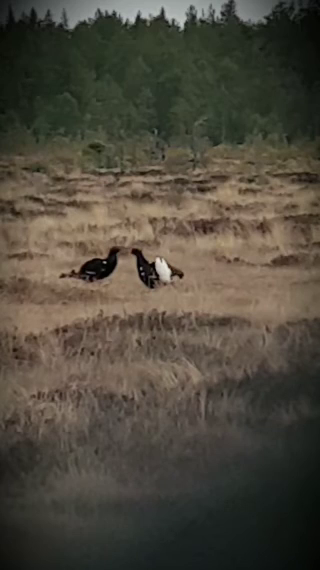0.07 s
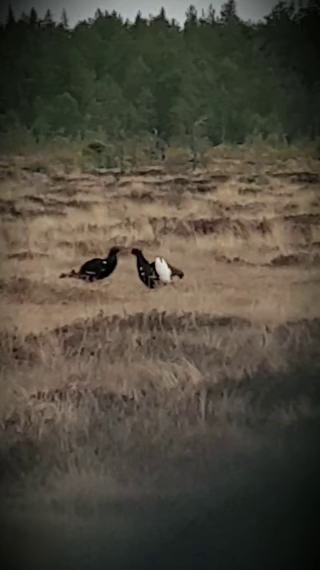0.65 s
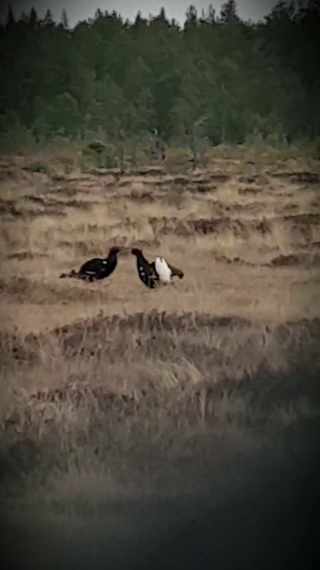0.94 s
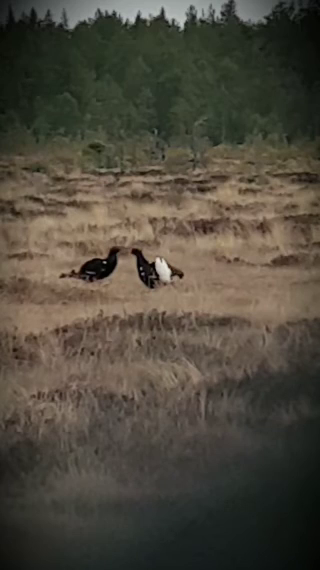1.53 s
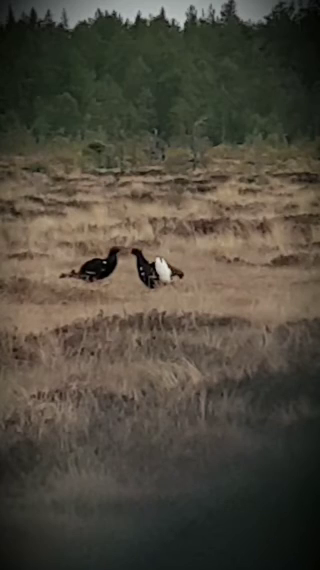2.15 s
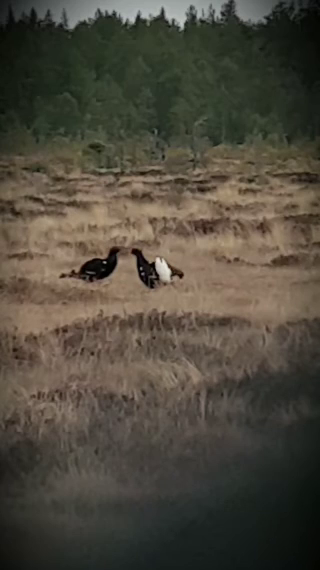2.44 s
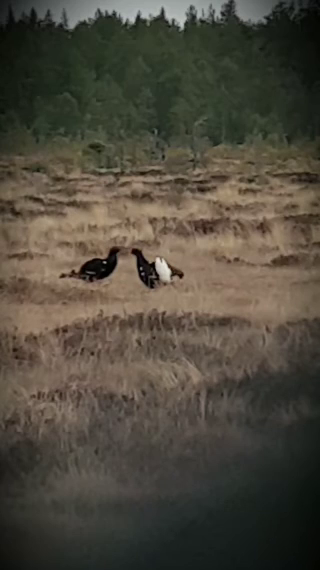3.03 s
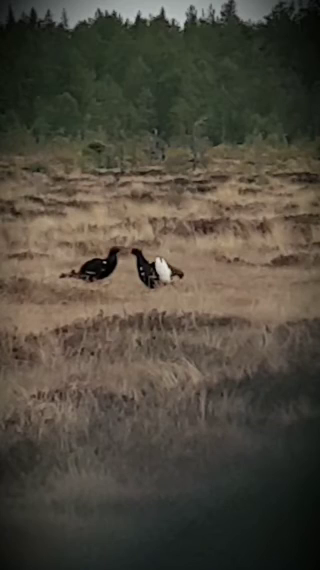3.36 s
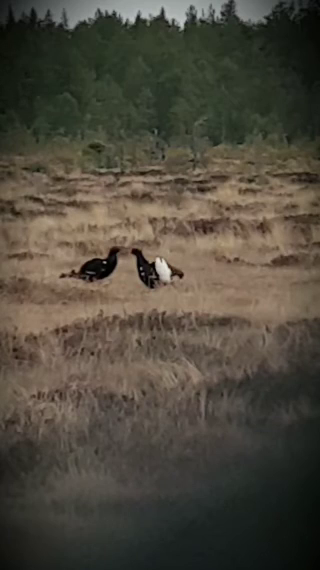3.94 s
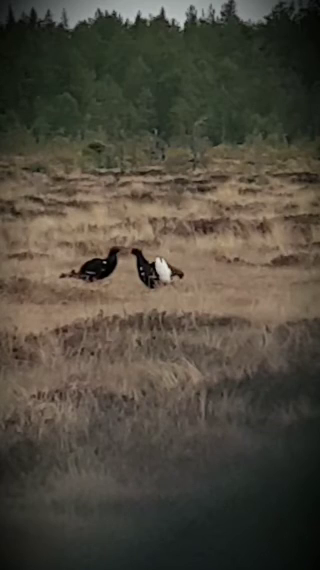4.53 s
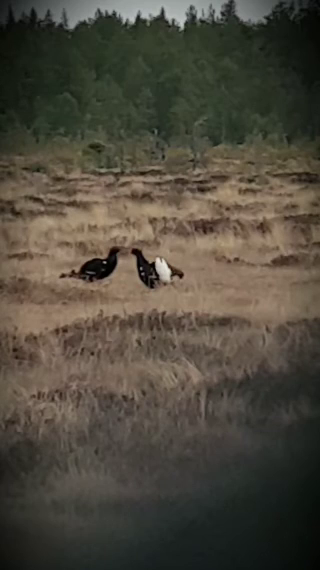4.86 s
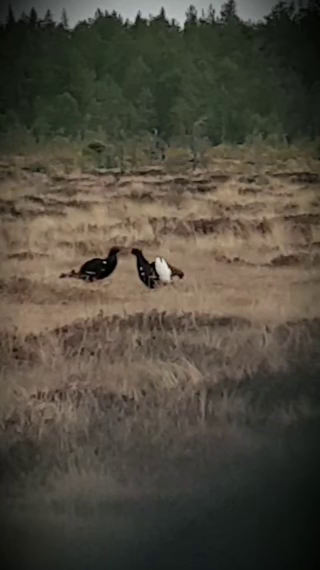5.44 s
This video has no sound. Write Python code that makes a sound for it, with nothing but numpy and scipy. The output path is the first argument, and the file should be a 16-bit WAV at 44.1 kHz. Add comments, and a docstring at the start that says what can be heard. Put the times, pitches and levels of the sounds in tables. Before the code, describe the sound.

A black grouse calls almost straight ahead on an open bog, over the soft continuous bubbling of other grouse and a quiet, wide rush of air. He opens with rounded coos until about 0.6 seconds. A rapid bubbling roll rises and swells from 0.7 to 1.8, leading to a cooed phrase from 2.1 to 3.5. Another roll runs from 3.5 to 4.5, and coos return from 4.8 to the end. Slightly right, a nearby songbird twitters quickly at the start and at 3.6, with short chirps around 1.4 and 2.8 and faint chips later. Farther right, a grouse gives one sharp rasping hiss at 0.5, with softer hisses near 1.1, 2.8 and 3.6. Thin distant whistles are clearest just after 3 seconds. Faint low calls come around 1.6, and faint nasal cackles at 2.2 and 4.8. The forest edge adds a slight echo.

```python
"""A black grouse cock displays on an open bog, bubbling in rising rolls that lead into cooed phrases.
Each note is an almost pure arched tone, coloured by the resonance of his inflated air sac.
Other cocks bubble around him and force rasping hisses through their throats. A songbird twitters close
by in quick sweeps of its syrinx; thin whistles, low calls and nasal cackles come from farther off.
Tussocks and the forest edge scatter the voices softly over the rush of still air."""
import sys
import numpy as np
from scipy import signal
from scipy.fft import rfft, irfft, next_fast_len
from scipy.io import wavfile
from scipy.ndimage import map_coordinates

SR = 44100
rng = np.random.default_rng(int(sys.argv[2]) if len(sys.argv) > 2 else 0)


def store_wav(level_fs):
    """Save 16-bit WAV to argv[1]."""
    pcm = np.round(np.clip(np.atleast_2d(level_fs), -1, 1) * 32767)
    wavfile.write(sys.argv[1], SR, pcm.T.astype(np.int16))


N = 246519


def amp(db):
    """Decibels to gain."""
    return 10 ** (np.asarray(db) / 20)


def unit(x):
    """Scale to rms 1."""
    return x / np.sqrt(np.mean(x ** 2) + 1e-20)


def along(points, hz):
    """Read a curve of (Hz, value) points on a log frequency axis."""
    freqs, values = np.transpose(points)
    return np.interp(np.log(hz + 1), np.log(freqs + 1), values)


def wobble(rate, size=N):
    """A smooth random curve, rate knots a second."""
    knots = rng.standard_normal(int(size * rate / SR) + 4)
    return map_coordinates(knots, [np.arange(size) * rate / SR])


def filtered(x, response):
    """Shape a sound with a gain given as a function of frequency."""
    size = next_fast_len(N + SR // 2)
    return irfft(rfft(x, size) * response(np.fft.rfftfreq(size, 1 / SR)), size)[..., :N]


def add(track, s, sound):
    """Mix a sound into the track from time s."""
    start = round(s * SR)
    sound = sound[max(-start, 0):max(N - start, 0)]
    track[max(start, 0):][:len(sound)] += sound


def phase(hz):
    """Running phase of a pitch curve."""
    return 2 * np.pi * np.cumsum(hz) / SR


def arch(first_hz, middle_hz, last_hz, size):
    """A pitch curve bent smoothly through three points."""
    parabola = np.polyfit([0, .5, 1], [first_hz, middle_hz, last_hz], 2)
    return np.polyval(parabola, np.linspace(0, 1, size))


def gate(size, attack, release):
    """An envelope with rounded ends; attack and release in seconds."""
    t = np.arange(size) / SR
    fade_in = np.sin(np.pi / 2 * np.minimum(t / attack, 1))
    fade_out = np.sin(np.pi / 2 * np.minimum(t[::-1] / release, 1))
    return (fade_in * fade_out) ** 2


def placed(x, left_db, lead_ms):
    """Pan a source: the left channel is left_db louder and lead_ms earlier than the right."""
    sides = np.array([[.5], [-.5]])
    return amp(left_db * sides) * filtered(x, lambda hz: np.exp(2j * np.pi * hz * sides * lead_ms / 1000))


def echo(x, decay, delay_s, spread):
    """Scattered sound: each frequency dies at its own speed; spread sets the stereo width."""
    hz, t, noise = signal.stft(rng.standard_normal((2, SR)), SR, nperseg=256)
    tail = signal.istft(noise * amp(-60 * t / along(decay, hz)[:, None]), SR, nperseg=256)[1]
    late = np.pad(x, (int(delay_s * SR), 0))
    mid, side = signal.fftconvolve(late[None], tail / np.linalg.norm(tail[0]), axes=1)[:, :N]
    return np.array([mid + spread * side, mid - spread * side])


# Resonance of the inflated throat. Each row: frequency in Hz, gain in dB.
AIR_SAC_EQ = [(350, 3.5), (450, 2), (550, 3.5), (610, -5.5), (670, -8), (780, -19.5)]

def coo(lead, rise, fall, first_hz, top_hz, last_hz, attack, release, waver=.0095, droop_db=2):
    """An arched tone that swells as it crosses the air sac's resonance, begun lead s before its top."""
    t = np.arange(-lead, fall, 1 / SR)
    rising = t < 0
    glide = np.minimum(np.abs(t / np.where(rising, rise, fall)), 1) ** np.where(rising, 1.2, 1.345)
    hz = top_hz + (np.where(rising, first_hz, last_hz) - top_hz) * glide
    hz *= 1 + waver * wobble(120, len(t))
    level = amp(along(AIR_SAC_EQ, hz) + droop_db * np.linspace(.5, -.5, len(t)))
    return np.sqrt(2) * level * gate(len(t), attack, release) * np.sin(phase(hz))


def bubble(hz, rise=.022, fall=.035, last=.735, release=.026):
    """One spindle-shaped note: a short lift, then a longer fading drop in pitch."""
    return coo(rise, rise, fall, .945 * hz, hz, last * hz, attack=rise, release=release)


def roll(first_s, last_s, start_hz, steady_db, final_db):
    """Evenly spaced notes (s, Hz, dB) that fade in, creep upward and surge at the end."""
    gap_s, fade_s, fade_db = .07, .22, 11
    creep_hz_per_s, surge_hz, pitch_surge_s, level_surge_s = 45, 124, .175, .25
    s = np.linspace(first_s, last_s, round((last_s - first_s) / gap_s) + 1)
    surge = lambda length_s: np.exp(-((last_s - s) / length_s) ** 2)
    fade = np.maximum(1 - ((s - first_s) / fade_s) ** 2, 0)
    hz = start_hz + creep_hz_per_s * (s - first_s) + surge_hz * surge(pitch_surge_s)
    db = steady_db - fade_db * fade + (final_db - steady_db) * surge(level_surge_s)
    return zip(s, hz, db)


# The cooed phrase. Each row: time of the note's top within the phrase, rise and fall in seconds,
# first, top and last pitch in Hz, level in dB.
COO_NOTES = [(0, .016, .014, 610, 645, 480, -21), (.08, .032, .032, 572, 621, 462, -16.5),
             (.2, .012, .017, 610, 603, 448, -16.5), (.335, .026, .032, 514, 652, 495, -13),
             (.388, .015, .016, 550, 595, 542, -23), (.42, .021, .027, 512, 523, 450, -21.5),
             (.512, .03, .022, 495, 641, 534, -10), (.539, .014, .024, 572, 643, 585, -10.5),
             (.603, .057, .047, 619, 671, 510, -14.5), (.693, .01, .01, 660, 652, 506, -23.5),
             (.735, .006, .011, 582, 547, 490, -21.5), (.768, .017, .022, 478, 495, 448, -30),
             (.845, .028, .031, 511, 686, 495, -9.5), (.926, .0055, .013, 676, 655, 478, -11.5),
             (1.025, .022, .035, 561, 604, 491, -19.5), (1.119, .029, .02, 525, 549, 522, -17.5),
             (1.177, .031, .033, 515, 670, 505, -8.5), (1.396, .007, .024, 712, 688, 429, -15)]
# Cues for the phrase. Each row: start in seconds, stretch factor on the note spacing.
COO_CUES = [(-.768, 1), (2.075, 1), (4.783, .98)]
# Rolls between the phrases. Each row: first and last note in seconds, starting pitch in Hz,
# steady and final level in dB, lag of the upper voice in seconds.
BUBBLING_ROLLS = [(.694, 1.801, 486, -26, -11, .008), (3.531, 4.512, 481, -28, -8.5, -.012)]

def near_cock(lead_s=.0185, upper_ratio=1.25, upper_db=-9, upper_limit_hz=520):
    """Rolls climb into a phrase of coos; a weak upper voice rides on each roll's low notes."""
    voice = np.zeros(N)
    for *shape, upper_lag in BUBBLING_ROLLS:
        for s, hz, db in roll(*shape):
            add(voice, s - lead_s, amp(db) * bubble(hz))
            if hz < upper_limit_hz:
                add(voice, s - lead_s + upper_lag, amp(db + upper_db) * bubble(hz * upper_ratio))
    for start, stretch in COO_CUES:
        for s, rise, fall, *pitches, db in COO_NOTES:
            lead = 1.04 * rise
            note = coo(lead, rise, fall, *pitches, attack=.7 * rise, release=.014)
            add(voice, start + stretch * s - lead, amp(db) * note)
    return voice


def syrinx(notes, waver, rasp_db, slur_s=.005):
    """A small bird's quickly swept tones, each slurred in slightly ahead of its beat."""
    track = np.zeros(N)
    for s, length, *pitches, db in notes:
        hz = np.pad(arch(*pitches, int(length * SR)), (int(slur_s * SR), 0), mode="edge")
        size = len(hz)
        level = amp(db + rasp_db * wobble(350, size)) * gate(size, slur_s + .5 * length, .14 * length)
        tone = np.sin(phase(hz * (1 + waver * wobble(700, size))))
        add(track, s - slur_s, np.sqrt(2) * level * tone)
    return track


# The songbird's twitter, its loose chirps in between, and another bird's faint chips.
# Each row: start and length in seconds, first, middle and last pitch in Hz, level in dB.
TWITTER_NOTES = [(0, .016, 2200, 2850, 4300, -27), (.016, .019, 2200, 2950, 4700, -24),
                 (.035, .043, 5000, 6700, 6200, -49), (.074, .034, 6050, 5850, 5850, -40),
                 (.106, .028, 5200, 3400, 4100, -22.5), (.133, .027, 2500, 2830, 4100, -20.5),
                 (.159, .028, 3400, 2850, 4300, -26), (.184, .05, 4250, 4530, 4470, -27),
                 (.23, .022, 4400, 3850, 3500, -32)]
LOOSE_CHIRPS = [(1.285, .022, 6600, 5950, 5600, -50), (1.338, .015, 2100, 2900, 4700, -30),
                (1.352, .035, 4850, 4450, 4800, -34), (1.386, .017, 4400, 3200, 2750, -26),
                (1.394, .038, 2740, 2720, 2740, -26.5), (1.462, .008, 1900, 2800, 3900, -28),
                (1.471, .011, 3800, 2900, 1700, -29), (2.821, .02, 3700, 4500, 4400, -43),
                (2.839, .01, 3100, 3600, 3900, -29), (2.848, .012, 3000, 3250, 3000, -33),
                (2.952, .045, 3500, 4850, 5050, -58), (3.039, .009, 2700, 3200, 4100, -39),
                (3.045, .018, 4200, 4420, 4350, -49)]
FAINT_CHIPS = [(2.291, .014, 4500, 5100, 5000, -48), (2.299, .011, 3900, 3700, 3600, -44),
               (4.774, .02, 6400, 5200, 4600, -45), (4.854, .018, 4500, 4750, 5000, -43),
               (5.45, .02, 5700, 5150, 4500, -53), (5.517, .02, 4100, 3600, 3500, -42)]
# Cues for the twitter. Each row: start in seconds, time stretch factor, gain in dB.
TWITTER_CUES = [(-.218, 1, 3), (.064, 1, -.5), (3.566, .985, 0)]
# Treble lost in the grass. Each row: frequency in Hz, gain in dB.
GRASS_EQ = [(2000, 1), (4600, -1.5), (5300, -6.5), (6200, 0.5), (7000, -11.5), (9000, -25)]

def small_birds():
    """Quick sweeps to the right, smeared by the tussocks; the farther bird has more scatter."""
    song = [(start + stretch * s, stretch * length, *pitches, db + song_db)
            for start, stretch, song_db in TWITTER_CUES for s, length, *pitches, db in TWITTER_NOTES]
    twitter = syrinx(song + LOOSE_CHIRPS, waver=.015, rasp_db=2)
    chips = syrinx(FAINT_CHIPS, waver=.05, rasp_db=3)
    tussocks = echo(amp(-4) * twitter + amp(-1) * chips, TUSSOCK_DECAY, delay_s=.001, spread=.9)
    trees = amp(-28) * echo(twitter + chips, FOREST_DECAY, delay_s=.02, spread=.8)
    birds = amp(-1.5) * (twitter + chips) + tussocks + trees
    return placed(filtered(birds, lambda hz: amp(along(GRASS_EQ, hz))), left_db=-2.8, lead_ms=0)


# Single short bubbles close by: each roll's closing note and other cocks' notes.
# Each row: time in seconds, pitch in Hz, level in dB.
SINGLE_BUBBLES = [(.705, 600, -28), (1.145, 612, -26), (1.212, 593, -27), (1.508, 631, -24),
                  (1.865, 552, -28), (1.925, 592, -27), (2.235, 614, -27), (2.315, 596, -29.5),
                  (2.54, 595, -25.5), (3.31, 589, -29), (4.582, 590, -22.5), (4.672, 619, -22),
                  (4.75, 551, -29), (4.825, 605, -26), (4.925, 599, -29), (5.06, 608, -25),
                  (5.45, 587, -25), (5.48, 650, -22.5), (5.512, 603, -24)]

def lek_bubbles(chorus_db=-41, chorus_hz=545, count=150):
    """Single short notes over the lek's bed of overlapping bubbles at scattered pitches."""
    chorus, singles = np.zeros(N), np.zeros(N)
    times = (np.arange(count) + rng.random(count)) / count * N / SR
    for s, (detune, accent) in zip(times, rng.standard_normal((count, 2))):
        add(chorus, s - .03, amp(2 * accent) * bubble(chorus_hz * np.exp(.09 * detune)))
    for s, hz, db in SINGLE_BUBBLES:
        add(singles, s - .016, amp(db) * bubble(hz, rise=.015, fall=.026, last=.86, release=.017))
    return singles + amp(chorus_db) * unit(chorus)


# Colour of the air bed. Each row: frequency in Hz, relative noise density in dB.
AIR_EQ = [(20, -11.5), (38, -12.5), (55, -6), (130, 0), (300, 1), (600, 7), (900, -3), (1400, -6.5),
          (2500, -13.5), (4000, -19), (6000, -28.5), (8000, -34), (10500, -41.5), (15500, -43.5)]
# Its stereo image, widest in the treble. Each row: frequency in Hz, left-right correlation.
AIR_CORRELATION = [(30, .7), (70, 0.58), (150, 0.27), (500, .4), (1500, 0.1), (8000, 0.042)]

def still_air(level_db=-45.5):
    """The soft wide rush of the bog and forest, drifting slightly in level."""
    def mid_side_gains(hz):
        width = np.arccos(np.clip(along(AIR_CORRELATION, hz), -1, 1)) / 2
        return amp(along(AIR_EQ, hz)) * [np.cos(width), np.sin(width)]
    mid, side = filtered(rng.standard_normal((2, N)), mid_side_gains)
    return amp(level_db + wobble(1.9) / 2) * unit(np.array([mid + side, mid - side]))


def hiss(throat, rasp_db):
    """A cock forces air through its throat, rasping unevenly."""
    noise = filtered(rng.standard_normal(N), lambda hz: amp(along(throat, hz)))
    return unit(noise * amp(rasp_db * wobble(110)))


# Envelope of the loudest hiss. Each row: time in seconds, level in dB.
SHARP_HISS = [(.44, -70), (.47, -41), (.5, -24.5), (.53, -31), (.565, -33), (.6, -44), (.64, -68)]
# Softer hisses. Each row: peak time, rise and fall in seconds, level in dB.
SOFT_HISSES = [(1.1, .42, .37, -43.5), (2.828, .045, .05, -44), (3.62, .42, .29, -49)]
# Throat colours of the sharp and the soft hisses. Each row: frequency in Hz, gain in dB.
SHARP_HISS_EQ = [(1000, -45), (1400, -21), (1600, -14), (1700, -2), (1800, 0), (1880, -12), (2000, -12),
                 (2200, -31), (2900, -29), (3200, -39), (3570, -28), (4300, -44), (7000, -62), (10000, -85)]
SOFT_HISS_EQ = [(900, -28), (1350, -10), (1600, -9), (1700, -1), (1800, 0), (1900, -12), (2400, -17),
                (3000, -23), (5200, -29), (7500, -45), (10000, -70)]

def hissing_cocks(swell_db=25):
    """One sharp burst of breath, and softer ones that swell to a rounded peak and fade."""
    t = np.arange(N) / SR
    burst = amp(np.interp(t, *np.transpose(SHARP_HISS), left=-np.inf, right=-np.inf))
    swells = sum(amp(db - swell_db * ((t - s) / np.where(t < s, rise, fall)) ** 2)
                 for s, rise, fall, db in SOFT_HISSES)
    return burst * hiss(SHARP_HISS_EQ, rasp_db=1.2) + swells * hiss(SOFT_HISS_EQ, rasp_db=2)


def calls(notes, throat, waver, flutter_db, partials):
    """Arched, wavering notes whose harmonics are balanced by a throat's colour."""
    track = np.zeros(N)
    for s, length, *pitches, db in notes:
        size = int(length * SR)
        hz = arch(*pitches, size)
        angle = phase(hz * (1 + waver * wobble(400, size)))
        tone = sum(amp(along(throat, k * hz)) * np.sin(k * angle) for k in range(1, partials + 1))
        level = amp(db + flutter_db * wobble(35, size)) * gate(size, length / 4, length / 3)
        add(track, s, level * unit(tone))
    return track


# Far whistles. Each row: start and length in seconds, first, middle and last pitch in Hz, level in dB.
WHISTLE_NOTES = [(.63, .18, 2560, 2490, 2430, -60), (2.378, .145, 3400, 3680, 3520, -53),
                 (2.75, .22, 2350, 2320, 2320, -54), (3.062, .08, 2540, 2410, 2400, -43),
                 (3.1, .205, 2280, 2245, 2260, -43), (3.13, .16, 2620, 2640, 2650, -56),
                 (4.1, .135, 2420, 2470, 2460, -55), (4.23, .1, 2470, 2450, 2420, -56),
                 (4.59, .11, 2440, 2490, 2510, -59)]
# Beak colour of the whistles and cackles. Each row: frequency in Hz, gain in dB.
BEAK_EQ = [(900, -32.5), (1900, -1), (3000, -1.5), (4000, -6), (5000, -9.5), (6000, -18.5), (7500, -41.5)]

def thin_whistles():
    """Pure tones that barely bend."""
    return calls(WHISTLE_NOTES, BEAK_EQ, waver=.007, flutter_db=2, partials=1)


# Low calls. Each row: start and length in seconds, first, middle and last pitch in Hz, level in dB.
LOW_NOTES = [(1.5, 0.054, 575, 562, 517, -46.5), (1.64, 0.14, 548, 565, 555, -50.5),
             (1.76, .15, 566, 545, 520, -49.5)]
# Their throat colour. Each row: frequency in Hz, gain in dB.
LOW_THROAT_EQ = [(550, -9), (1100, 0.5), (1650, -7), (2200, -25.5), (4000, -44.5)]

def low_calls():
    """Short calls made hoarse by a jittering pitch, strongest in the second harmonic."""
    return calls(LOW_NOTES, LOW_THROAT_EQ, waver=.04, flutter_db=2.5, partials=4)


# Cackles. Each row: start and length in seconds, first, middle and last pitch in Hz, level in dB.
CACKLE_NOTES = [(2.205, .062, 930, 988, 900, -49), (4.77, .097, 786, 904, 810, -56)]

def nasal_cackles():
    """Brief calls with strong overtones over a weak fundamental."""
    return calls(CACKLE_NOTES, BEAK_EQ, waver=.015, flutter_db=2, partials=6)


def far_voices():
    """Hisses and calls from across the bog, off to the right, with their scatter."""
    hisses, whistles, cackles, low = hissing_cocks(), thin_whistles(), nasal_cackles(), low_calls()
    trees = amp(-22) * echo(hisses + low, FOREST_DECAY, delay_s=.01, spread=.8)
    tussocks = amp(-6) * echo(cackles + low + whistles, TUSSOCK_DECAY, delay_s=.005, spread=.8)
    return placed(hisses + whistles + cackles + low + trees + tussocks, left_db=-4.5, lead_ms=.01)


# Tails of the forest edge and the tussocks. Each row: frequency in Hz, seconds to fall by 60 dB.
FOREST_DECAY = [(300, 1), (700, .8), (2000, .45), (8000, 0.19)]
TUSSOCK_DECAY = [(500, .12), (3000, .085), (8000, .065)]

def scene():
    """Bubbling grouse almost ahead, the other voices to the right, all over a bed of still air."""
    grouse = near_cock() + lek_bubbles()
    trees = amp(-25) * echo(grouse, FOREST_DECAY, delay_s=.04, spread=.6)
    tussocks = amp(-16.5) * echo(grouse, TUSSOCK_DECAY, delay_s=.008, spread=.4)
    direct = placed(grouse, left_db=1.5, lead_ms=.07)
    return direct + trees + tussocks + small_birds() + far_voices() + still_air()


def record(dry):
    """Tiny fades at both ends and a steep cut of the highest treble."""
    top_hz = 15700
    return filtered(dry * gate(N, attack=.002, release=.004), lambda hz: hz < top_hz)


dry = scene()
out = record(dry)
store_wav(out)
```